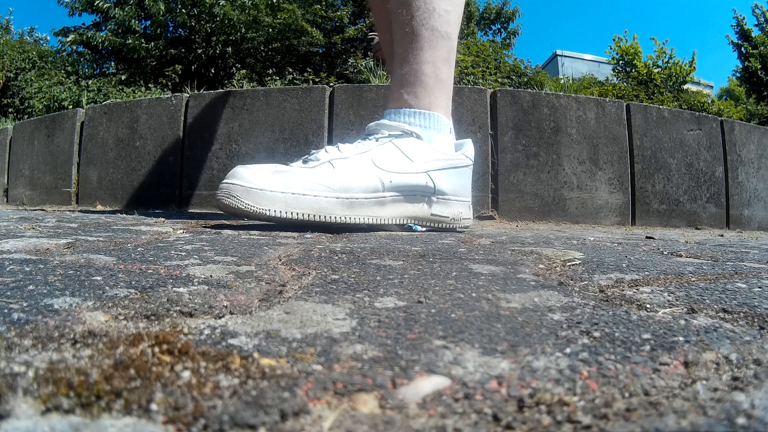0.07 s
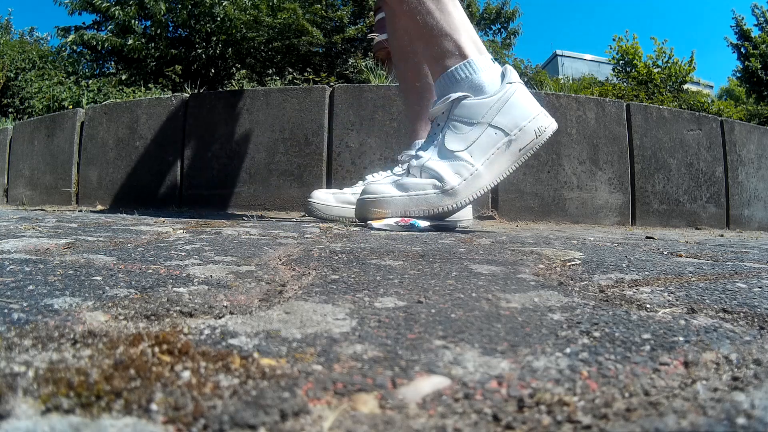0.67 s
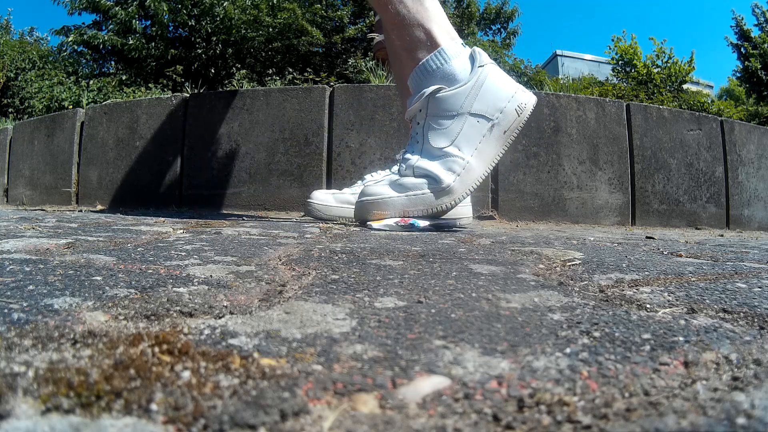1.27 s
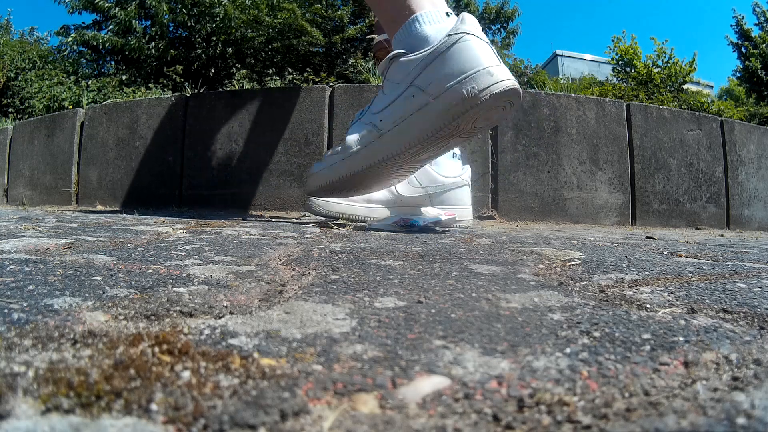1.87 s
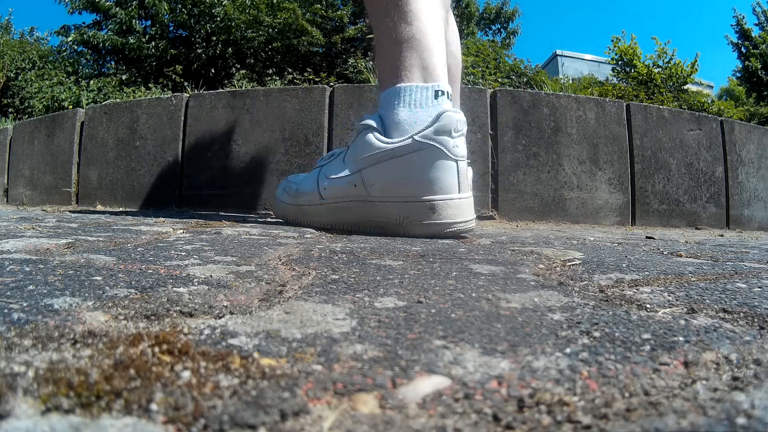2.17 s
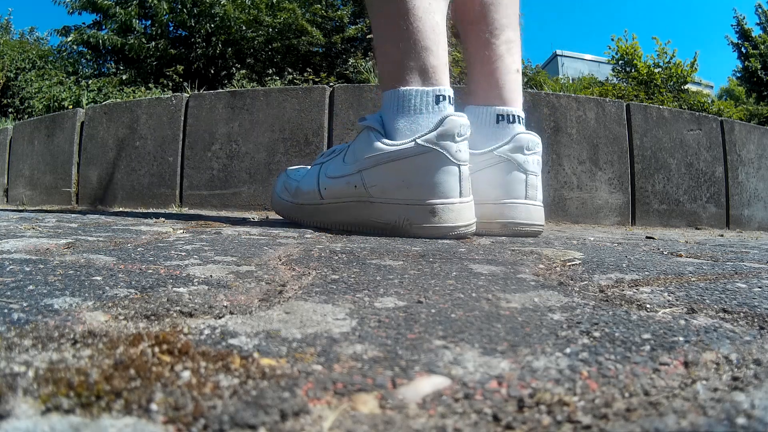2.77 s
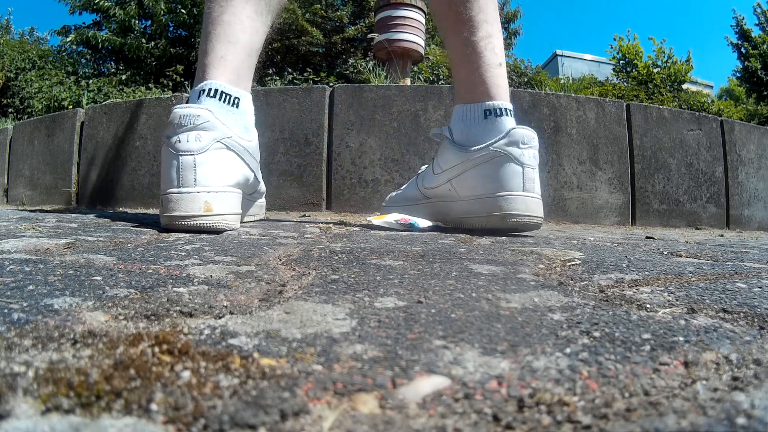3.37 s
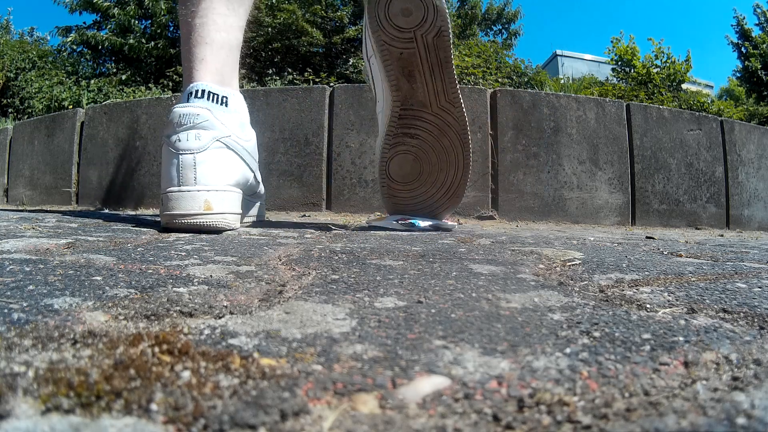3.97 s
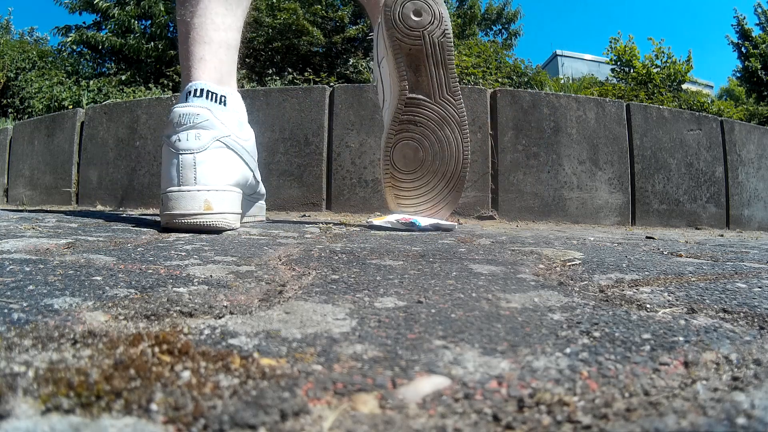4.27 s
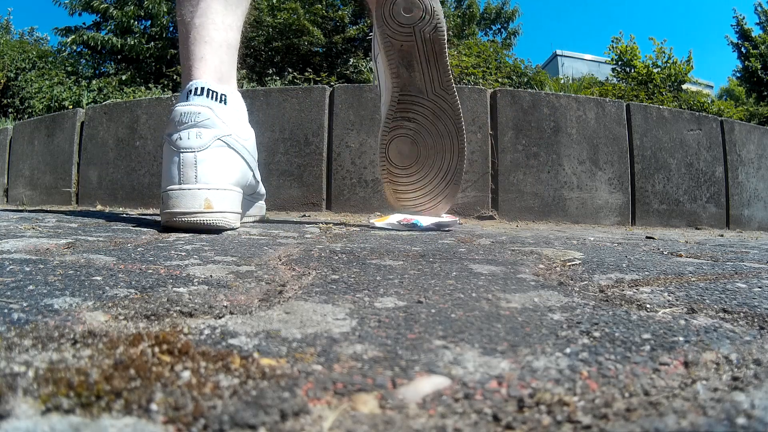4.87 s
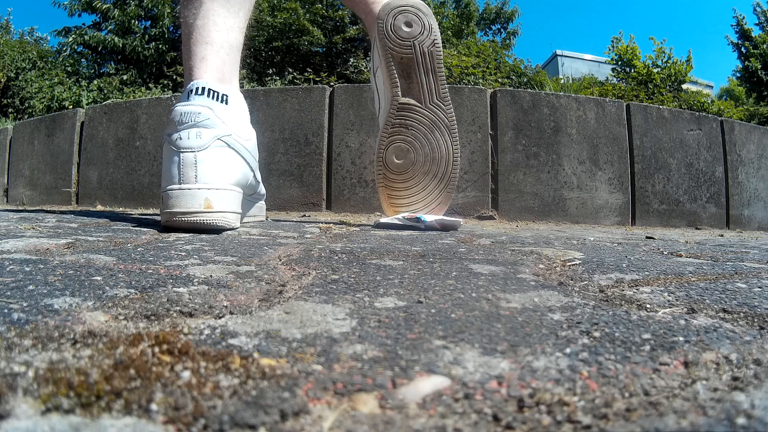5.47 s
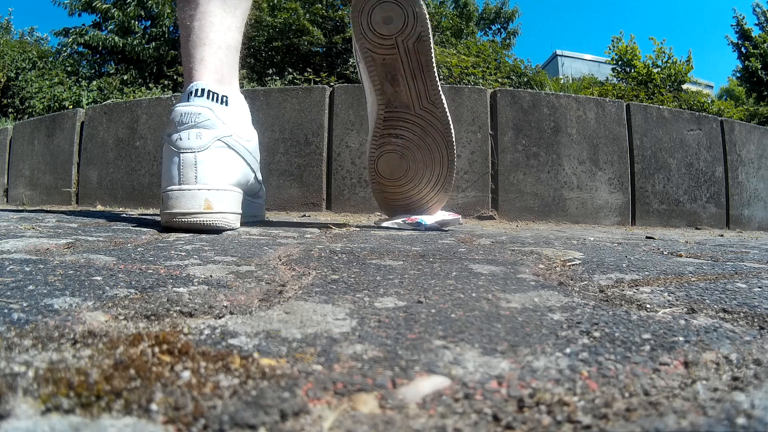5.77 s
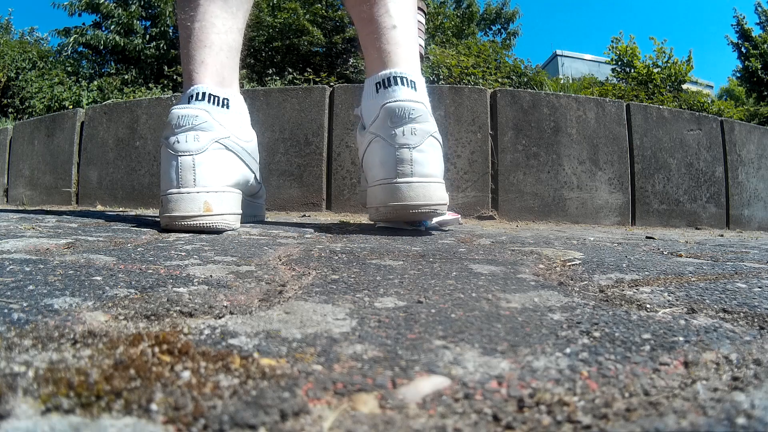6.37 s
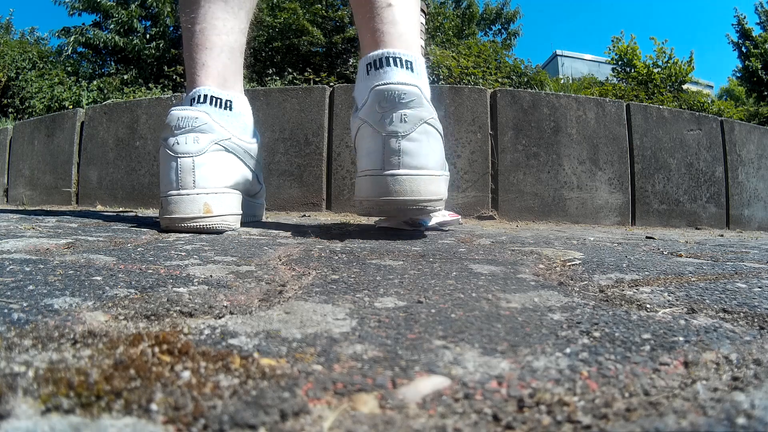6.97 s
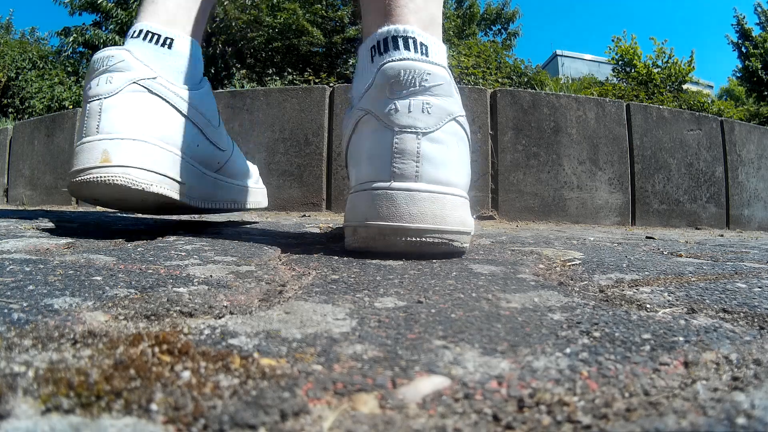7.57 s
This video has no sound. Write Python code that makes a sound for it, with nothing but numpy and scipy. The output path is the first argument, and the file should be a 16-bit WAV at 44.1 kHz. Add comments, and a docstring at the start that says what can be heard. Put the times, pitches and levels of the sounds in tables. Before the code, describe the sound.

Someone in trainers treads on a flattened cup on outdoor paving. The cup snaps and crunches dryly, loudest under an early stamp, then creaks briefly as a toe pushes on it. Soft hollow steps and gritty scuffs mix with further bursts of crackling, separated by short pauses, and a few footsteps finish. The sounds are close to a microphone near the ground, over a quiet outdoor hush.

```python
"""Dry snaps come from a flattened cup as someone in trainers treads it into outdoor paving.
Each fold buckles with a crack and sets the panels and creases ringing; the cup rustles as it is crushed
and creaks by stick-slip friction. Soles thud and scuff on grit. Reflection from the paving colours these
sounds, and a low stone wall answers faintly over an outdoor hush and a camera's hiss and whine."""
import sys
import numpy as np
from scipy import signal
from scipy.fft import rfft, irfft, next_fast_len
from scipy.io import wavfile
from scipy.ndimage import map_coordinates

SR = 44100
rng = np.random.default_rng(int(sys.argv[2]) if len(sys.argv) > 2 else 0)


def log_audio(samples):
    """Write samples as a 16-bit WAV file to the path given in sys.argv[1]."""
    # one column per channel
    frames = np.atleast_2d(samples).T
    # limit to full scale, then quantise
    limited = np.clip(frames, -1, 1)
    pcm = np.round(limited * 32767).astype(np.int16)
    wavfile.write(sys.argv[1], SR, pcm)


N = 340011
HIT_T = np.arange(4096) / SR  # time axis of one impact, t/s


def amp(db):
    """Amplitude ratio of a level in decibels."""
    return 10 ** (np.asarray(db) / 20)


def unit(x):
    """Normalisation to rms 1."""
    return x / np.sqrt(np.mean(x ** 2) + 1e-20)


def hit(x, db, window_s=0.005):
    """Equivalent level: x is given the energy of a sound of rms level db lasting window_s."""
    return amp(db) * x * np.sqrt(window_s * SR / (np.sum(x ** 2) + 1e-20))


def along(points, hz):
    """Interpolation of (f/Hz, value) points on a logarithmic frequency axis."""
    f, value = np.transpose(points)
    return np.interp(np.log(hz + 1), np.log(f + 1), value)


def bell(hz, pitch_hz, depth_db):
    """Spectral peak in dB, depth_db down an octave either side of its pitch."""
    return -depth_db * np.log2(1 + np.log2((hz + 1) / pitch_hz) ** 2)


def coloured(x, gain_db):
    """Zero-phase filtering by a gain in dB that depends on frequency."""
    size = next_fast_len(len(x) + len(HIT_T))
    gain = amp(gain_db(np.fft.rfftfreq(size, 1 / SR)))
    return irfft(rfft(x, size) * gain, size)[:len(x)]


def wobble(rate):
    """Random modulation: a smooth curve through rate knots a second."""
    knots = rng.standard_normal(int(N * rate / SR) + 4)
    return map_coordinates(knots, [np.arange(N) * rate / SR])


def add(track, start, x):
    """Superposition of x on the track from start, in seconds."""
    i = max(0, round(start * SR))
    track[i:i + len(x)] += x[:max(0, N - i)]


def train(count, jitter, scatter_db):
    """Quasi-periodic pulses as (place 0-1, chance level/dB); jitter is a share of their spacing."""
    shift, strength = rng.standard_normal((count, 2)).T
    places = (np.arange(count) + jitter * shift) / (count - 1)
    return zip(places, scatter_db * strength)


def ring(modes, emphasis_db, damping, attack_s, scatter):
    """Damped modes, each T60 divided by damping; every blow bends the object and detunes them."""
    hz, db, t60 = np.transpose(modes)[:, :, None]
    detune, strength, phase = rng.standard_normal((3, len(modes), 1))
    level = db + emphasis_db(hz) + 1.5 * strength - 60 * HIT_T * damping / t60
    waves = amp(level) * np.sin(2 * np.pi * (hz * (1 + scatter * detune) * HIT_T + phase))
    return waves.sum(0) * (1 - np.exp(-HIT_T / attack_s))


# spectrum of hush and hiss together (f/Hz, relative level/dB)
NOISE_SPECTRUM = [(12, -33), (20, -10), (70, -2), (107, -3.5), (149, -1), (203, -4.5), (233, -5.5),
                  (276, -3.5), (326, -9), (469, -10.5), (1350, -19), (8790, -27), (9830, -25), (14500, -26),
                  (15800, -31.5)]
# tones of the camera's whine (f/Hz, level/dB)
WHINE_TONES = [(9491, -89.5), (9561, -90), (11822, -98)]


def background(split_hz=2500, fade_db_per_s=0.17):
    """Noise floor: distant outdoor rumble slowly eases; the camera's hiss and whine stay level."""
    t = np.arange(N) / SR
    noise = unit(coloured(rng.standard_normal(N), lambda hz: along(NOISE_SPECTRUM, hz)))
    low = coloured(noise, lambda hz: -20 * np.log10(1 + (hz / split_hz) ** 2))
    hush = low * amp(-57.5 - fade_db_per_s * t + 0.2 * wobble(4.5))
    hiss = amp(-63.5) * (noise - low)
    whine = sum(amp(db) * np.sqrt(2) * np.sin(2 * np.pi * hz * t + 1.6 * wobble(16))
                for hz, db in WHINE_TONES)
    return hush + hiss + whine


# reverberation time of the yard (f/Hz, T60/s)
YARD_DECAY = [(200, 0.27), (1500, 0.19), (5000, 0.12), (14000, 0.24)]
# spectrum at the start of its tail (f/Hz, relative level/dB)
YARD_SPECTRUM = [(100, 4), (700, -3), (2200, -2), (5000, 0), (14000, -9.5)]


def yard(x, delay_s=0.01, stretches=24):
    """Diffuse reflection: wall and bushes scatter a short tail, drawn anew for each stretch of time."""
    out = np.zeros(N)
    for part in np.array_split(np.arange(N), stretches):
        hz, t, noise = signal.stft(rng.standard_normal(SR // 3), SR, nperseg=256)
        level = along(YARD_SPECTRUM, hz)[:, None] - 60 * t / along(YARD_DECAY, hz)[:, None]
        tail = signal.istft(noise * amp(level), SR, nperseg=256)[1]
        add(out, part[0] / SR + delay_s, signal.fftconvolve(x[part], tail / np.linalg.norm(tail)))
    return out


# response just above the paving (f/Hz, gain/dB)
PAVING_RESPONSE = [(2200, 0), (2600, 0), (2950, .5), (3800, -.5), (4350, 1), (4750, 3), (5300, 7),
                   (5750, -3.5), (6200, 6.5), (6700, 2), (8500, 5.5), (10300, -4), (11500, 1.5),
                   (16000, -4)]


def paving(x):
    """Interference: direct sound and its reflection from the ground form peaks and notches."""
    return coloured(x, lambda hz: along(PAVING_RESPONSE, hz))


# spectrum of a crack (f/Hz, relative level/dB)
CRACK_SPECTRUM = [(1500, -39), (3500, -13), (5000, -2.5), (7000, -0.5), (9000, 3), (12500, 2), (16000, -3)]


def crack(t60):
    """Broadband transient: a sudden release of stress radiates a bright, very short burst."""
    burst = rng.standard_normal(len(HIT_T)) * amp(-60 * HIT_T / t60)
    return coloured(burst, lambda hz: along(CRACK_SPECTRUM, hz))


def grit(count=22, loudest_db=-66):
    """Random impulses: stray grains of sand tick under the standing weight."""
    out = np.zeros(N)
    for place, weakness in rng.random((count, 2)):
        add(out, place * N / SR, hit(crack(t60=0.0085), loudest_db - 7 * weakness))
    return out


# spectrum of rubbing and crushing on grit (f/Hz, relative level/dB)
GRIT_SPECTRUM = [(100, -17), (400, 6), (1200, 1), (2100, -3), (3000, -8), (5000, -19), (8500, -21.5),
                 (16000, -15)]
# soles scuff on grit and the cup rustles as it is crushed (peak t/s, duration/s, level/dB, emphasis f/Hz)
SCUFFS_AND_RUSTLES = [(.215, .11, -48, 1600), (0.593, 0.1, -53.5, 1150), (1.615, 0.091, -54, 2200),
                      (2.109, 0.085, -52.5, 2400), (2.179, .06, -51, 1610), (2.381, 0.041, -55.5, 1500),
                      (2.58, .08, -51.5, 930), (2.673, 0.077, -49.5, 960), (2.887, 0.19, -58.5, 1090),
                      (3.44, 0.074, -59.5, 5500), (3.871, 0.073, -55, 1400), (3.908, 0.039, -38, 1840),
                      (4.898, 0.12, -48.5, 1870), (5.019, 0.041, -49, 2100), (5.044, 0.019, -38, 1810),
                      (5.788, 0.065, -48, 2080), (6.468, 0.048, -59, 1000), (6.507, 0.047, -44.5, 2600),
                      (7.309, 0.077, -53, 2080), (7.442, 0.054, -59.5, 1190), (7.667, 0.075, -54, 1290),
                      (7.654, 0.044, -57.5, 12000)]


def scuffs_and_rustles(grains_per_s=2500, spread_db=5.0, rise_share=0.37):
    """Granular noise: dense, uneven impulses swell and fade as a sole slides or the cup is crushed."""
    out = np.zeros(N)
    t = np.arange(SR // 2) / SR
    for peak, length, db, pitch_hz in SCUFFS_AND_RUSTLES:
        rise = rise_share * length
        impulses = (rng.random(len(t)) < grains_per_s / SR) * rng.choice([-1, 1], len(t))
        grains = impulses * amp(spread_db * rng.standard_normal(len(t)))
        noise = coloured(grains, lambda hz: along(GRIT_SPECTRUM, hz) + bell(hz, pitch_hz, depth_db=3.5))
        swell = np.interp(t, [0, rise, length], [0, 1, 0])
        add(out, peak - rise, amp(db) * unit(noise) * swell)
    return out


# modes of a sole and the air squeezed from under it (f/Hz, relative level/dB, nominal T60/s)
SOLE_MODES = [(109, -4, 0.064), (170, -7, 0.042), (267, -4, 0.044), (396, -2, 0.031), (594, -1, 0.031),
              (833, 0.5, 0.024), (1030, -10.5, 0.011)]
# a sole meets the ground (t/s, level/dB, emphasis f/Hz)
FOOTFALLS = [(0.5576, -27, 620), (2.109, -43.5, 250), (2.377, -47.5, 690), (2.572, -43, 250),
             (2.6395, -35.5, 690), (2.687, -38, 760), (3.488, -45.5, 650), (3.907, -38, 420),
             (5.042, -49.5, 422), (6.505, -45.5, 300), (7.287, -41.5, 328), (7.303, -46.5, 425),
             (7.646, -38, 231), (7.658, -41, 510)]


def steps():
    """Impact excitation: rubber soles land with a short hollow thud."""
    out = np.zeros(N)
    for start, db, pitch_hz in FOOTFALLS:
        thud = ring(SOLE_MODES, lambda hz: bell(hz, pitch_hz, depth_db=5.5),
                    damping=0.91, attack_s=0.00091, scatter=0.048)
        add(out, start, hit(thud, db))
    return out


# modes of the patch of cup pinned under the toe (f/Hz, relative level/dB, T60/s)
PATCH_MODES = [(670, -7, 0.012), (1227, 1.5, 0.015), (1560, 2.5, 0.01), (2200, -6, 0.015),
               (3430, -6.5, 0.0078), (4850, -12.5, 0.0064)]


def slip(patch_db, crack_db, scatter=0.025):
    """Free vibration damped by the foot: the same patch slips each time, so it rings nearly alike."""
    hz, db, t60 = np.transpose(PATCH_MODES)[:, :, None]
    sign = np.resize([1, -1], hz.shape)
    detune, strength = rng.standard_normal((2, len(hz), 1))
    # a soft slip, with little crack, barely reaches the upper modes
    dull_db = np.clip(patch_db - crack_db - 13.5, 0, 8) * np.clip(np.log2(hz / 1500), 0, 1)
    level = db - dull_db + strength - 60 * HIT_T / t60
    patch = sign * amp(level) * np.sin(2 * np.pi * hz * (1 + scatter * detune) * HIT_T)
    return hit(patch.sum(0), patch_db) + hit(crack(t60=0.0053), crack_db)


# pushes of the toe (t/s, duration/s, slips, first level/dB, last level/dB, louder end's crack level/dB)
TOE_PUSHES = [(0.1434, .0466, 12, -48, -40.5, -53.5), (1.2348, 0.11, 10, -44.5, -43.5, -57.5),
              (1.4565, .083, 8, -43, -50, -56.5)]


def creaks(hurry=0.24, crack_db_per_db=2.3):
    """Stick-slip friction: the cup catches and lets go; the harder a slip, the sharper its crack."""
    out = np.zeros(N)
    for start, length, slips, first_db, last_db, crack_db in TOE_PUSHES:
        for place, chance_db in train(round(slips), jitter=0.03, scatter_db=1.2):
            # slips crowd together in mid-push, where the foot moves fastest
            progress = place + hurry * np.sin(2 * np.pi * place) / (2 * np.pi)
            db = first_db + (last_db - first_db) * place + chance_db
            sharpness_db = crack_db_per_db * (db - max(first_db, last_db))
            add(out, start + length * progress, slip(db, crack_db + sharpness_db))
    return out


# modes of the cup's broad panels (f/Hz, relative level/dB, nominal T60/s)
PANEL_MODES = [(400, -5, 0.08), (697, -2, 0.021), (962, 1.5, 0.011), (1200, 1, 0.011), (1570, -4, 0.015),
               (1824, 5, 0.0097), (2140, 3, 0.0092)]
# modes of its stiff rim and creases (f/Hz, relative level/dB, nominal T60/s)
CREASE_MODES = [(2880, 3.5, 0.018), (3400, 7.5, 0.0069), (3790, 4, 0.0082), (4710, -6, 0.0097),
                (5030, -1, 0.01)]


def snap(panel_db, panel_hz, crack_db, crease_hz):
    """Snap-through buckling: a fold gives way, cracks, rings the creases and flips a panel."""
    dull_db = panel_db - crack_db
    # the creases follow both panel and crack; small, high panels ring them harder
    crease_db = panel_db - 0.55 * dull_db - 0.2 + 6.5 * np.log2(panel_hz / 1570)
    # a fold hidden under the sole has little crack and arrives more by a bounce off the shoes
    hidden = np.clip((dull_db - 14.0) / 18, 0, 1)
    lag = int(SR * rng.uniform(0.003165, 0.0046))
    bounce = lambda x: x + amp(-16.0 + 10.3 * hidden) * np.pad(x, (lag, 0))[:len(x)]
    panel = ring(PANEL_MODES, lambda hz: bell(hz, panel_hz, depth_db=10),
                 damping=1.22, attack_s=0.00079, scatter=0.038)
    crease = ring(CREASE_MODES, lambda hz: bell(hz, crease_hz, depth_db=19),
                  damping=1.13, attack_s=0.0001, scatter=0.017)
    return hit(bounce(panel), panel_db) + hit(bounce(crease), crease_db) + hit(crack(0.0059), crack_db)


# a crease runs on through several folds (t/s, duration/s, folds, loudest place 0-1,
# panel level/dB, panel f/Hz, crack level/dB, crease f/Hz)
FOLD_RUNS = [(0.225, .018, 3, 0, -32, 1680, -53, 3580), (1.596, 0.033, 7, 0.95, -39.5, 1490, -59.5, 3730),
             (3.897, .0194, 5, 1, -31.5, 1450, -54.5, 3350),
             (4.09, .0205, 5, 0.41, -36.5, 1750, -48.5, 4750),
             (5.0375, 0.01, 4, 0.66, -33.5, 1710, -54.5, 3250),
             (5.723, 0.063, 4, 0.66, -54.5, 2100, -65, 3200),
             (6.501, 0.018, 4, 0.1, -44.5, 1700, -65, 2900)]


def crunches(fall_db_per_run=13.5):
    """Buckling cascade: each fold sets off the next, weaker the farther it is from the loudest place."""
    out = np.zeros(N)
    for start, length, folds, loudest, panel_db, panel_hz, crack_db, crease_hz in FOLD_RUNS:
        for place, chance_db in train(round(folds), jitter=0.04, scatter_db=0.64):
            force_db = chance_db - fall_db_per_run * abs(place - loudest)
            fold = snap(panel_db + force_db, panel_hz, crack_db + force_db, crease_hz)
            add(out, start + length * place, fold)
    return out


# single folds give way (t/s, panel level/dB, panel f/Hz, crack level/dB, crease f/Hz)
SINGLE_FOLDS = [(0.1089, -53, 1340, -71, 3600), (0.199, -42, 1410, -64, 3700), (.206, -44, 1600, -65, 3200),
                (0.2162, -36.5, 1700, -61, 3200), (0.3682, -31.5, 1400, -56.5, 3450),
                (0.5581, -26.5, 1170, -49, 4000), (0.575, -41, 1240, -63, 3900),
                (.5885, -46, 1420, -49, 4300), (0.6535, -50.5, 1280, -62.5, 3600),
                (.702, -52, 1610, -67, 3200), (.796, -56.5, 1480, -79, 3400),
                (1.1, -62.5, 1590, -62.5, 3630), (1.2177, -54, 1380, -75, 3400),
                (1.5546, -49, 1170, -57.5, 3830), (1.6561, -40, 1930, -50, 3400),
                (1.6947, -35.5, 1270, -65, 3200), (2.0815, -45.5, 1100, -62, 3400),
                (2.0864, -34.5, 1750, -57, 3020), (2.095, -44, 1710, -59, 3200),
                (2.1165, -55, 1490, -57.5, 3700), (2.142, -55, 1400, -62, 4400),
                (2.1492, -43, 1440, -66, 3200), (2.1706, -40.5, 1460, -78, 3200),
                (2.191, -50, 1530, -71, 3300), (2.2899, -50, 1090, -74, 3400),
                (2.2471, -39, 1400, -68, 3200), (2.3174, -41, 1440, -70, 3200),
                (2.6398, -34.5, 1040, -63.5, 3240), (2.6898, -40.5, 890, -77, 3400),
                (2.8974, -52, 1350, -67, 3300), (2.9723, -53, 1850, -83, 3100),
                (3.0375, -49, 1350, -60, 3400), (3.0982, -53, 1320, -74, 3500),
                (3.334, -50.5, 1480, -62, 3740), (3.364, -54.5, 1470, -65, 3900),
                (3.4165, -56.5, 1310, -58.5, 3900), (3.48, -53, 1340, -63, 3400),
                (3.488, -33, 1430, -53.5, 3130), (3.5244, -45, 1080, -64.5, 3400),
                (3.9959, -53.5, 1630, -60.5, 3900), (4.0847, -36, 1790, -48.5, 3830),
                (4.1162, -39, 1750, -56, 3350), (4.1407, -53, 1800, -63, 3500),
                (4.1459, -35, 1950, -52, 3720), (4.168, -46.5, 1720, -58, 3500),
                (4.3226, -35, 1750, -52, 4050), (4.367, -49.5, 1730, -59.5, 3800),
                (4.8326, -48.5, 1810, -57, 3600), (4.841, -47, 1630, -51.5, 3620),
                (4.8551, -34, 1980, -57, 3550), (4.8808, -38, 1630, -63, 3200),
                (4.9297, -37, 1660, -62, 3300), (5.7708, -36, 2040, -54, 3180),
                (6.4968, -44, 1730, -45.5, 2850), (6.5356, -41, 1470, -72, 3100),
                (6.5458, -41.5, 1420, -70, 3100), (6.765, -43.5, 1510, -68.5, 3100),
                (6.7803, -46, 1400, -68, 3200), (7.303, -43, 1290, -64, 3200)]


def snaps():
    """Crumpling of a thin shell: the trodden cup releases its elastic energy fold by fold."""
    out = np.zeros(N)
    for start, *fold in SINGLE_FOLDS:
        add(out, start, snap(*fold))
    return out


def scene():
    """Superposition of cup and shoes, their reverberation and the background, in one channel."""
    near = paving(snaps() + crunches() + creaks() + steps() + scuffs_and_rustles() + grit())
    return (near + amp(-18.0) * yard(near) + background())[None]


def record(dry):
    """Band limiting: the camera's response falls steeply above its top frequency."""
    top_hz = 15850
    return np.array([coloured(x, lambda hz: np.clip((top_hz - hz) / 20, -100, 0)) for x in dry])


dry = scene()
out = record(dry)
log_audio(out)
```